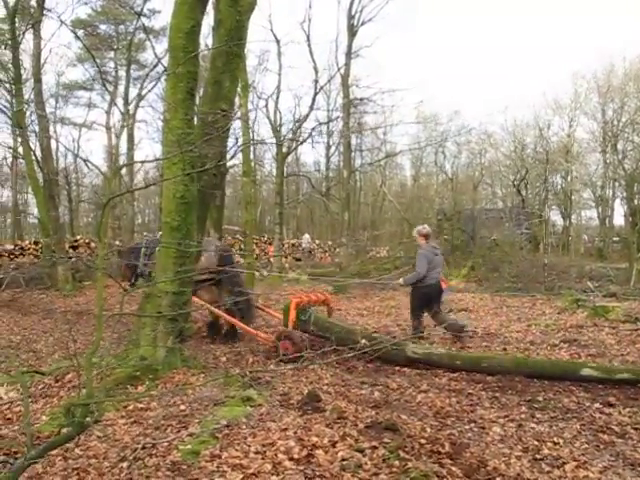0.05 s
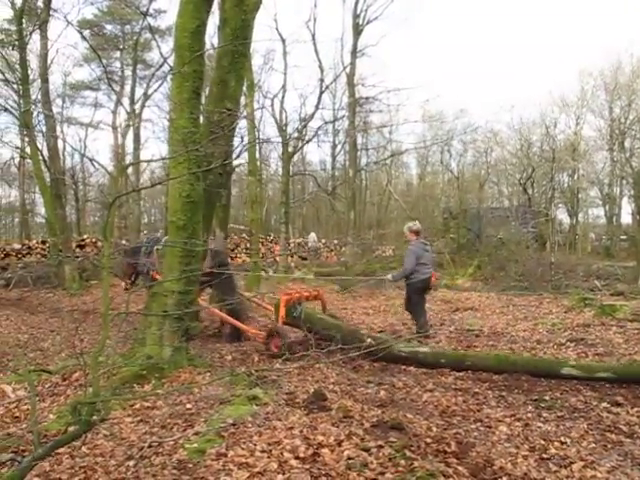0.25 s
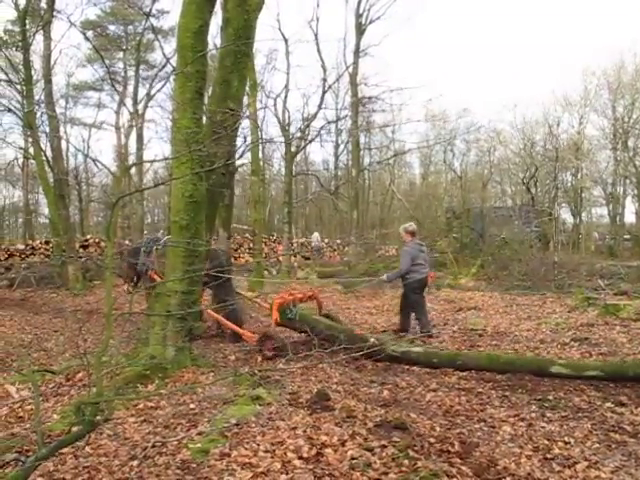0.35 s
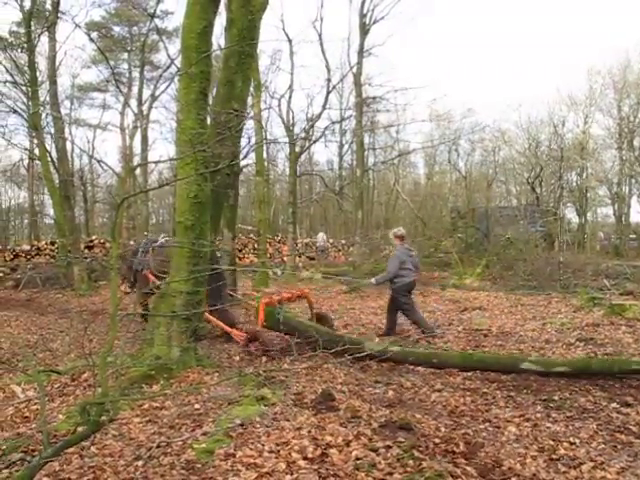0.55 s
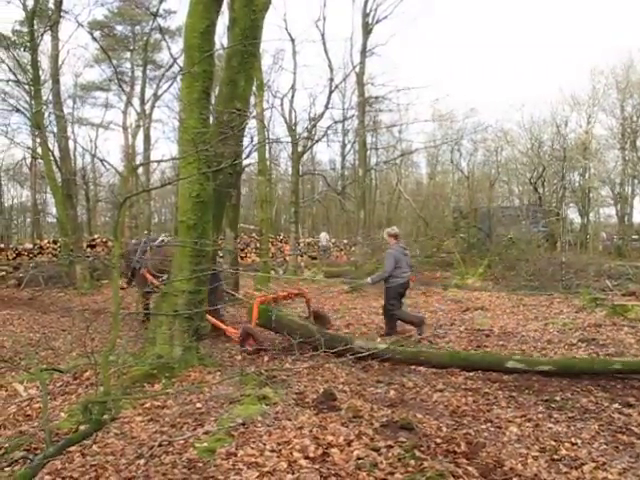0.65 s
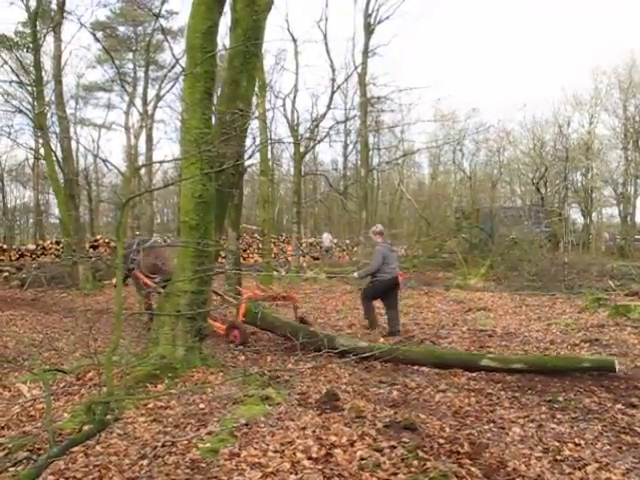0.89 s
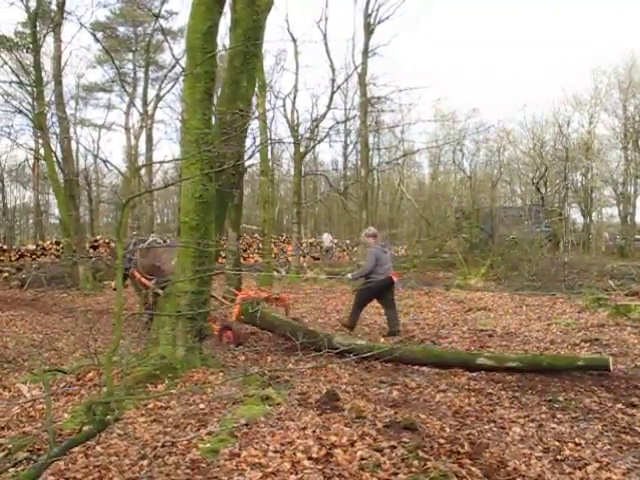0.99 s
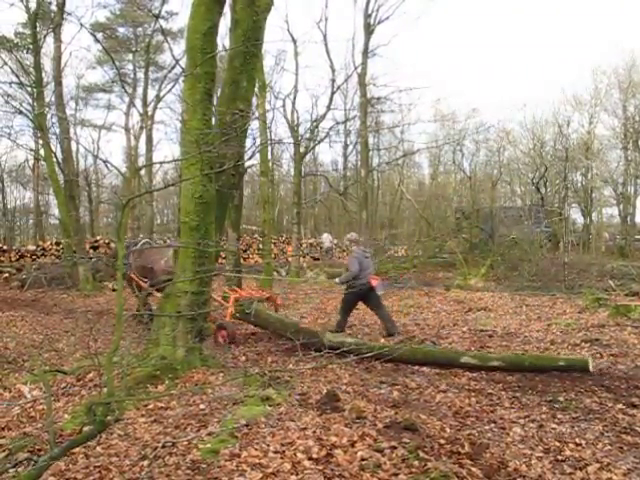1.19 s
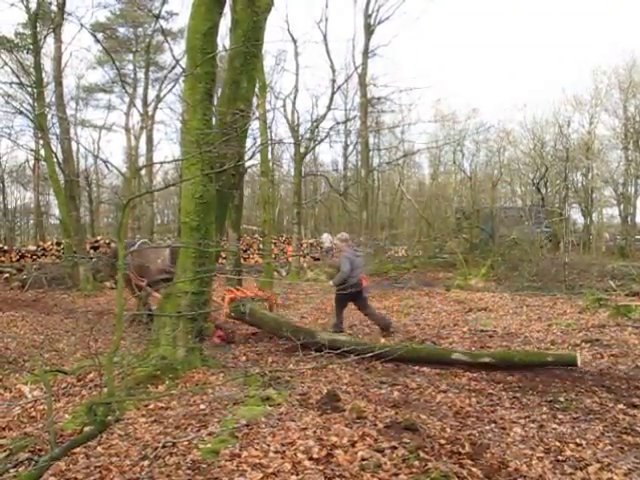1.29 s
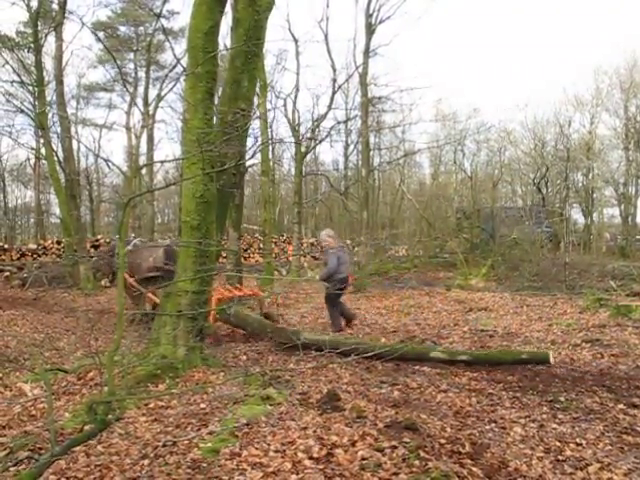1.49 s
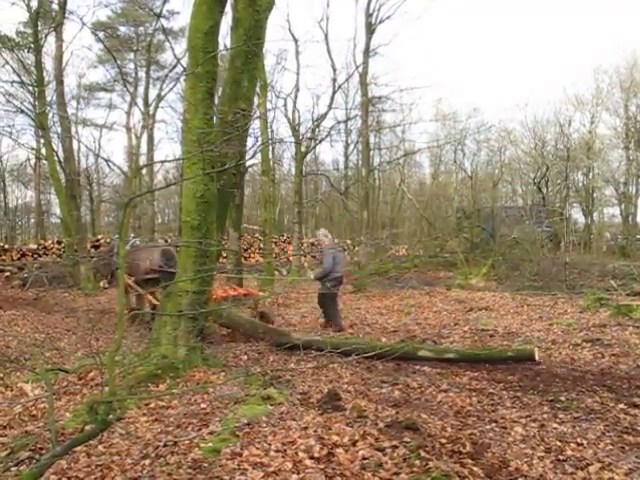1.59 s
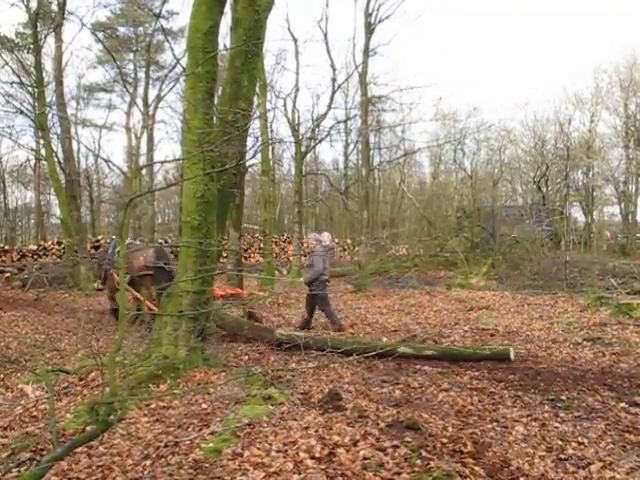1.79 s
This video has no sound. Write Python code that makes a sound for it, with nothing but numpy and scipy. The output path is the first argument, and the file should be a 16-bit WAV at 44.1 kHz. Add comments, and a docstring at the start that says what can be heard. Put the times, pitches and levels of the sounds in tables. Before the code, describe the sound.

Metal harness chains clink and rattle as a horse drags a log over dry leaves.

```python
"""Horse hauling a log

A horse drags a log over dry leaves in a quiet wood. Up front the harness steel clinks: links, hook,
shackle and a small ring each tick on contact and ring on, and slack chain runs together in short rattles.
Underneath sit dull footfalls on soft earth and the rumble, bark scrape and leaf rustle of the log."""
import sys
import numpy as np
from scipy import signal
from scipy.fft import rfft, irfft
from scipy.io import wavfile
from scipy.ndimage import uniform_filter1d

SR = 44100
rng = np.random.default_rng(int(sys.argv[2]) if len(sys.argv) > 2 else 0)


def store_wav(level_fs):
    """Save 16-bit WAV to argv[1]."""
    pcm = np.round(np.clip(np.atleast_2d(level_fs), -1, 1) * 32767)
    wavfile.write(sys.argv[1], SR, pcm.T.astype(np.int16))


N = 81585
T = np.arange(N) / SR


def clinks():
    """Steel parts strike: a contact tick, a ring that buzzes as they chatter, a jolt to nearby links."""
    # ringing modes of each steel part: f/Hz, level/dB, t60/s before the strike's stretch
    steel = { "link": [(2566, -30.5, 0.15), (5173, 2.5, 0.055), (8770, -27.5, 0.11), (12000, -41, 0.21)],
             "hook": [(2524, -23, 0.14), (5288, 0.5, 0.083), (9150, -24.5, 0.24), (10500, -40.5, .13),
             (12600, -47, 0.18)], "ring": [(3670, -19, 0.11), (6700, 8, 0.12), (7004, 1, 0.21),
             (9555, -4, 0.19), (10630, -10.5, 0.13), (12580, -19, 0.27), (14500, -26, 0.16)],
             "shackle": [(2824, 2, 0.11), (2976, -7, 0.11), (3480, -8, 0.071), (4594, 7.5, 0.03),
             (7970, -13, 0.12)], "pin": [(2570, -0.5, 0.18), (4600, -14, 0.052)],
             "buckle": [(8400, -5.5, 0.058)]}
    # strikes: t/s, part, ring level/dB, build-up/s, ring stretch, tick level/dB
    strikes = [ (.001, "hook", -30, 0.0018, 1.95, -34), (.042, "ring", -37, 0.0023, 1.13, -30.5),
               (.086, "ring", -37, .004, 0.54, -53), (0.091, "pin", -34.5, 0.0033, 0.91, -32),
               (0.206, "ring", -35.5, .002, 0.72, -23.5), (0.259, "link", -7, 0.004, 0.97, -23),
               (0.295, "shackle", -31, 0.005, 0.84, -27.5), (0.351, "shackle", -29.5, 0.0023, 0.75, -27),
               (.415, "shackle", -17.5, 0.0043, 1.26, -16), (0.425, "link", -8.5, 0.0039, 0.65, -16),
               (0.4824, "link", -6, 0.00089, 1.13, -8.5), (0.6178, "hook", -22, 0.00045, 0.67, -26),
               (0.648, "link", -15.5, 0.00063, 0.9, -21.5), (0.727, "ring", -35.5, 0.0017, 0.67, -57),
               (0.8162, "link", -6, 0.004, 0.59, -26.5), (.889, "ring", -34, 0.0012, 0.19, -23),
               (0.915, "ring", -41, 0.0026, 0.9, -42), (0.951, "shackle", -22.5, 0.0057, 0.99, -37),
               (0.9736, "shackle", -25, 0.00067, 0.4, -27), (0.9852, "pin", -20, 0.0015, .4, -18.5),
               (1.015, "buckle", -21, 0.00091, 1.3, -19), (1.0234, "shackle", -23, .002, 0.72, -17),
               (1.038, "link", -10, .002, 0.39, -20), (1.0445, "shackle", -14.5, 0.0019, 0.43, -9),
               (1.058, "link", -7.5, 0.0012, 0.7, -11.5), (1.068, "hook", -9, 0.0015, 0.75, -12),
               (1.087, "link", -12, 0.0024, 0.54, -35), (1.102, "link", -19, 0.0026, .6, -39),
               (1.162, "shackle", -27.5, 0.0038, 0.52, -45), (1.311, "hook", -17, 0.00027, 1.03, -25),
               (1.371, "hook", -35, 0.0057, 1.1, -34), (1.442, "pin", -35, .001, 1.04, -36),
               (1.4923, "hook", -16.5, 0.00025, 0.92, -19), (1.537, "shackle", -46, 0.0036, 0.46, -26),
               (1.5867, "link", -6, 0.003, 0.85, -26.5), (1.666, "ring", -46.5, .004, 0.65, -52),
               (1.761, "ring", -48.5, 0.0025, 0.45, -54)]
    # spectrum of the contact tick: f/Hz, level/dB
    tick_eq = [(500, -36), (1800, -4), (4800, 5.5), (7000, 3), (11000, -21.5), (15500, -67)]
    # spectrum of a ringing link buzzing against the next: f/Hz, level/dB
    buzz_eq = [(3000, -32), (4100, -27), (4600, 5.5), (5700, -13), (6300, 0.5), (7200, -27), (11000, -67)]
    tick_fade_s = 0.0012
    jolt_db, jolt_fade_s = -8.5, 0.0061
    buzz_db, buzz_fade_s = -16, 0.011
    rings = np.zeros(N + SR)
    contact, jolt, chatter = np.zeros((3, N))
    for start, part, ring_db, build, stretch, tick_db in strikes:
        tone = ring(steel[part], stretch, spread_db=2.5)
        at = round(start * SR)
        rings[at:at + len(tone)] += amp(ring_db) * tone * np.minimum(T[:len(tone)] / build, 1)
        contact += amp(tick_db) * burst(start, build, tick_fade_s)
        jolt += amp(tick_db + jolt_db) * burst(start, build, jolt_fade_s)
        chatter += amp(ring_db + buzz_db) * burst(start, build, buzz_fade_s * stretch)
    ticks = colour(contact * rng.standard_normal(N), tick_eq)
    buzz = colour(chatter * rng.standard_normal(N), buzz_eq)
    return rings[:N] + ticks + buzz + shaken_chain(jolt)


def ring(modes, stretch=1, spread_db=0):
    """Struck steel, choked ever faster by its neighbours; weaker modes beat and vary with strike point."""
    beat_depth, max_beat_hz, choke, attack_s = 0.4, 60, 1.15, 0.00025
    t = T[:SR // 2]
    top_db = max(db for _, db, _ in modes)
    out = np.zeros(len(t))
    for hz, db, t60 in modes:
        strike_point, split, phase = rng.standard_normal(), rng.random(), rng.random()
        beating = 1 + beat_depth * np.cos(2 * np.pi * (max_beat_hz * split * t + phase))
        shimmer = amp(spread_db * strike_point) * beating if db < top_db else 1
        fall_db = -60 * (t / (t60 * stretch)) ** choke
        out += amp(db + fall_db) * shimmer * np.sin(2 * np.pi * hz * t)
    return out * (1 - np.exp(-(t / attack_s) ** 2))


def rattles():
    """Slack chain runs together: ringing links over dry knocks."""
    # runs of slack chain: t/s, swell/s, fade/s, ringing level/dB, clatter level/dB
    runs = [ (0.203, 0.0017, 0.028, -27.5, -25.5), (0.411, 0.012, 0.014, -40, -19.5),
            (0.448, 0.0038, 0.01, -30.5, -24), (0.783, 0.003, 0.018, -32.5, -25.5),
            (0.949, 0.0037, 0.084, -54, -26.5), (1.004, 0.0013, 0.03, -27, -24),
            (1.042, 0.0083, 0.014, -19.5, -23), (1.085, 0.0025, 0.036, -37, -36.5),
            (1.158, 0.004, 0.062, -33.5, -41.5), (1.481, 0.0024, 0.012, -36, -38),
            (1.536, 0.001, 0.0035, -23, -29.5), (1.669, 0.0018, 0.026, -39.5, -37.5)]
    # spectrum of steel knocking on steel: f/Hz, level/dB
    clatter_eq = [(150, -4.5), (600, -2.5), (2500, 0), (4800, 2), (6500, 3.5), (8500, -12.5),
                  (11000, -25.5), (15500, -50)]
    ringing = sum(amp(db) * burst(start, swell, fade) for start, swell, fade, db, _ in runs)
    knocking = sum(amp(db) * burst(start, swell, fade) for start, swell, fade, _, db in runs)
    return shaken_chain(ringing) + colour(knocking * knocks(), clatter_eq)


def shaken_chain(strength):
    """Many links collide in quick succession; each mode is rung by its own hits."""
    # modes of the heavy chain: f/Hz, relative level/dB, t60/s
    modes = [(2257, -10, 0.064), (2535, -8, 0.062), (2784, 1.5, 0.03), (3027, -12.5, 0.077),
             (3260, -14, 0.013), (3493, -7.5, 0.1), (3920, -6, 0.055), (4590, -0.5, 0.029),
             (4506, 5.5, 0.02), (4990, 0, 0.069), (6217, -1.5, 0.042), (7800, -10.5, 0.031)]
    tones = np.array([ring([mode]) for mode in modes])
    jingle = np.zeros(N)
    for tone in tones:
        hits = strength * crackle(per_s=700, spread_db=4.5)
        jingle += signal.fftconvolve(hits, tone)[:N]
    return jingle / np.linalg.norm(tones)


def knocks():
    """Links held tight collide: dry, fast-dying pips at pitches scattered across the band."""
    pitch_count, top_hz, swell_s = 40, 15800, 0.0006
    t = T[:SR // 20]
    envelope = t / swell_s * np.exp(-t / swell_s)
    pitches = (np.arange(pitch_count) + rng.random(pitch_count)) * top_hz / pitch_count
    clatter = np.zeros(N)
    for hz in pitches:
        pip = envelope * np.sin(2 * np.pi * hz * t)
        clatter += signal.oaconvolve(crackle(per_s=160, spread_db=2.5), pip)[:N]
    return unit(clatter)


def thuds():
    """Hooves, boots and the bumping log push soft ground: a few dull, uneven cycles and a puff of earth."""
    # footfalls and bumps: t/s, fade/s, f/Hz, level/dB
    impacts = [(0.033, .06, 57.7, -36.5), (0.207, .025, 55.6, -33), (0.208, .015, 675, -34),
               (0.22, 0.026, 136, -31.5), (0.224, 0.033, 459.6, -31), (0.306, 0.037, 55, -28.5),
               (0.397, 0.011, 219.3, -25.5), (0.417, 0.013, 231, -25), (0.796, 0.014, 252, -37),
               (0.828, 0.012, 288, -28.5), (0.988, 0.012, 273, -25), (0.989, .01, 442, -30.5),
               (1.026, 0.007, 786, -25), (1.016, 0.0095, 1310, -22), (1.084, 0.0085, 537, -30),
               (1.494, 0.025, 145, -35), (1.508, 0.039, 54, -33)]
    # spectrum of soft earth underfoot: f/Hz, level/dB
    earth_eq = [(50, -10), (130, 1.5), (250, 8), (600, -19.5), (5000, -63)]
    wander_cycles, earth_db = 0.3, -12
    out = np.zeros(N)
    for start, fade, hz, db in impacts:
        wander = unit(uniform_filter1d(rng.standard_normal(N), size=150))
        pitch_hz = hz + wander_cycles / fade * wander  # shorter thuds waver more
        cycles = np.cumsum(pitch_hz * (T > start)) / SR
        earth = amp(earth_db) * colour(rng.standard_normal(N), earth_eq)
        out += amp(db) * burst(start, rise=0.0027, fade=fade) * (np.sin(2 * np.pi * cycles) + earth)
    return out


def log_drag():
    """The log rumbles on the ground, its bark scrapes, and leaves crackle under it."""
    # fader moves of the drag, ahead of the mix: t/s, rumble level/dB, scrape level/dB, leaf level/dB
    faders = [(0, -48.5, -41.5, -38.5), (.2, -43, -39.5, -35), (.4, -41.5, -40.5, -35),
              (.55, -52.5, -50.5, -42), (.7, -49.5, -45.5, -41), (.88, -45, -45, -34),
              (1.05, -38, -43, -30.5), (1.13, -57, -52, -36.5), (1.42, -51.5, -47, -45),
              (1.52, -50, -44.5, -40.5), (1.69, -45, -42, -38), (1.85, -48, -42.5, -41.5)]
    # spectrum of the ground rumble: f/Hz, level/dB
    rumble_eq = [(15, -13), (32, -13), (52, 2), (75, -6.5), (100, -10), (250, -10), (360, -22.5),
                 (900, -59)]
    # spectrum of scraping bark: f/Hz, level/dB
    scrape_eq = [(100, -29), (250, 0), (380, -9.5), (520, -3.5), (760, 3), (1050, -5), (1350, -2.5),
                 (1800, -11.5), (8000, -47)]
    # spectrum of crushed dry leaves: f/Hz, level/dB
    leaf_eq = [(600, -11), (1600, -4), (2600, 2.5), (3600, -2), (5000, 1), (6800, -2.5), (9000, -11),
               (11500, -27), (15500, -41)]
    times, *levels = np.transpose(faders)
    rumble_gain, scrape_gain, leaf_gain = (amp(np.interp(T, times, db)) for db in levels)
    rumble = rumble_gain * unit(colour(rng.standard_normal(N), rumble_eq))
    scrape = scrape_gain * unit(colour(crackle(per_s=9000, spread_db=1.02), scrape_eq))
    centre, *sides = (unit(colour(crackle(per_s=9200, spread_db=1.5), leaf_eq)) for _ in range(3))
    rustle = leaf_gain * (0.5 * centre + 0.3 * np.array(sides))
    return rumble + scrape + rustle


def woodland(x):
    """Adds bright close reflections and a faint tail scattered by the trunks, different at each ear."""
    # decay of the echo from the trunks: f/Hz, t60/s
    decay = [(2000, 0.043), (5000, 0.46), (12000, 0.27)]
    tail_db, near_db, near_fade_s = -19, -10, 0.004
    hz, t, spectrum = signal.stft(rng.standard_normal((2, SR // 2)), SR, nperseg=256)
    fall_db = -60 * t / curve_at(decay, hz)[:, None]
    tail = signal.istft(spectrum * amp(fall_db), SR)[1]
    near = rng.standard_normal(tail.shape) * np.exp(-T[:tail.shape[1]] / near_fade_s)
    near = np.diff(near, 2, prepend=np.zeros((2, 2)))  # keeps the treble
    echo = amp(tail_db) * tail / np.linalg.norm(tail[0]) + amp(near_db) * near / np.linalg.norm(near[0])
    return x + signal.fftconvolve(x[None], echo, axes=1)[:, :N]


def amp(db):
    """Decibels to gain."""
    return 10 ** (np.asarray(db) / 20)


def unit(x):
    """Scales to rms 1."""
    return x / np.sqrt(np.mean(x ** 2) + 1e-20)


def curve_at(points, hz):
    """Interpolates a curve on a log-frequency axis."""
    f, value = np.transpose(points)
    return np.interp(np.log(hz + 1), np.log(f + 1), value)


def colour(x, eq):
    """Minimum-phase EQ of unit energy with the given spectrum."""
    hz = abs(np.fft.fftfreq(8192, 1 / SR))
    log_gain = np.log(amp(curve_at(eq, hz)))
    response = np.exp(np.conj(signal.hilbert(log_gain)))
    taps = np.fft.ifft(response).real[:4096]
    return signal.fftconvolve(x, taps / np.linalg.norm(taps))[:N]


def crackle(per_s, spread_db):
    """Random clicks of uneven size, rms 1."""
    size = amp(spread_db * np.minimum(rng.exponential(1, N), 4))
    return unit(size * rng.choice([-1, 1], N) * (rng.random(N) < per_s / SR))


def burst(start, rise, fade):
    """Envelope with a straight attack and an exponential fade; times in seconds."""
    return np.clip((T - start) / rise, 0, 1) * np.exp(-np.maximum(T - start - rise, 0) / fade)


def scene():
    """Harness steel echoes among the trees, over dry footfalls and the dragging log."""
    return woodland(clinks() + rattles()) + thuds() + log_drag()


def record(dry):
    """Two close microphone ports differ in level and phase; peaks are rounded off, then low-passed."""
    # balance between the ports: f/Hz, left minus right level/dB
    balance = [(1000, 0.5), (2700, -0.5), (4400, 0), (5200, 5.5), (6000, -1.5), (7000, -13), (15000, -9.5)]
    # phase between the ports: f/Hz, left lead/rad
    lead = [(300, 0), (1000, -0.26), (2800, -0.63), (4500, -0.79), (6200, -1.76), (8400, -1.26),
            (11000, 0.95)]
    knee, ceiling, cutoff_hz = 0.75, 0.98, 15800
    hz = np.fft.rfftfreq(2 * N, 1 / SR)
    left = amp(curve_at(balance, hz) / 2) * np.exp(0.5j * curve_at(lead, hz))
    ports = np.array([left, 1 / left]) / np.sqrt((abs(left) ** 2 + abs(left) ** -2) / 2)
    stereo = irfft(rfft(dry, 2 * N) * ports)[:, :N]
    clipped = np.clip(stereo, -knee, knee)
    rounded = clipped + (ceiling - knee) * np.tanh((stereo - clipped) / (ceiling - knee))
    lowpass = signal.firwin(511, cutoff_hz, window=("kaiser", 9), fs=SR)
    return signal.oaconvolve(rounded, lowpass[None], "same")


dry = scene()
out = record(dry)
store_wav(out)
```